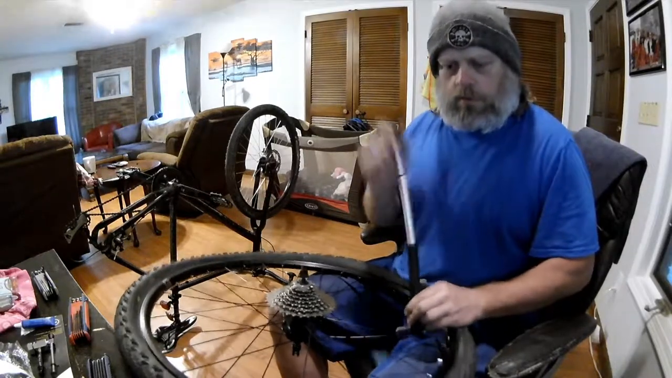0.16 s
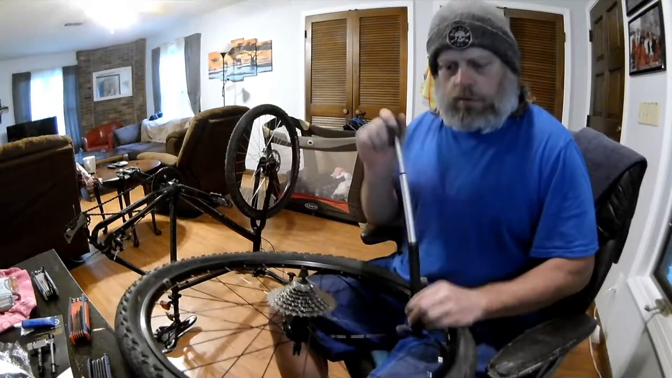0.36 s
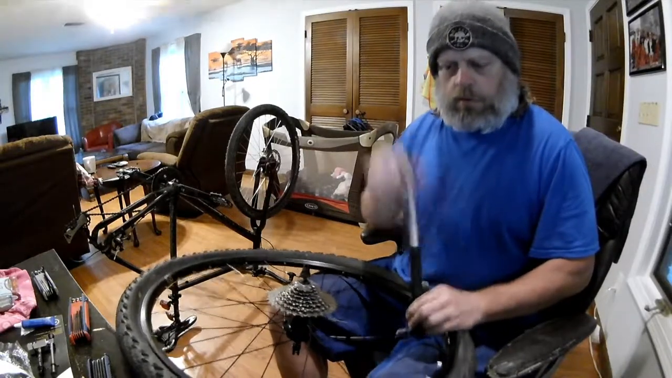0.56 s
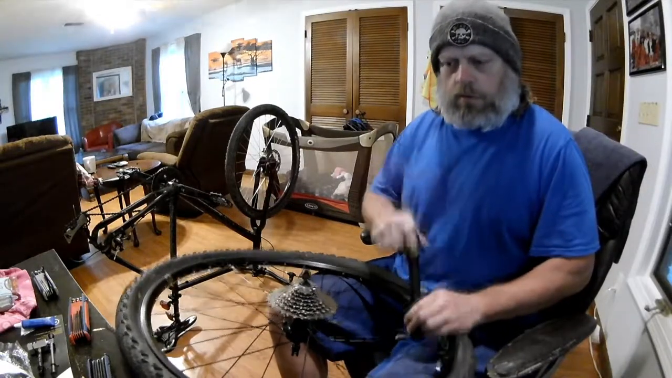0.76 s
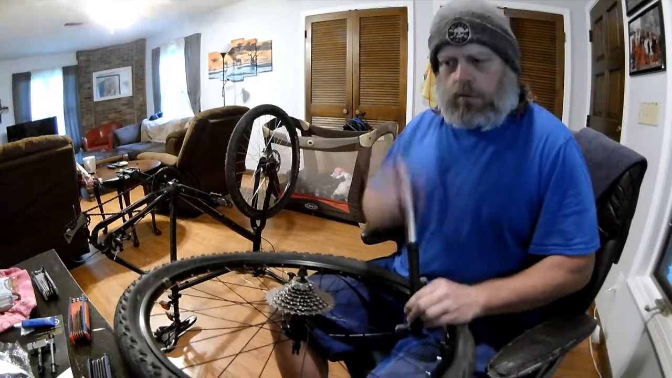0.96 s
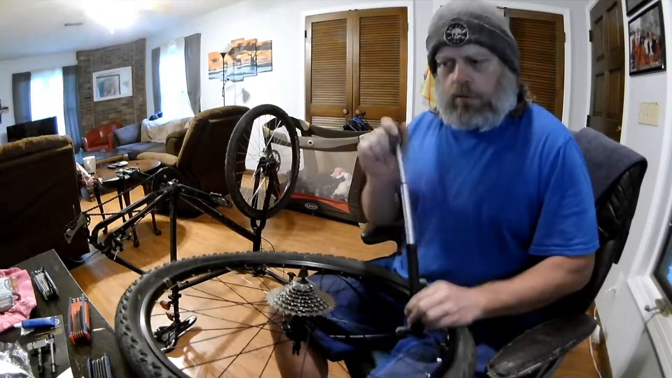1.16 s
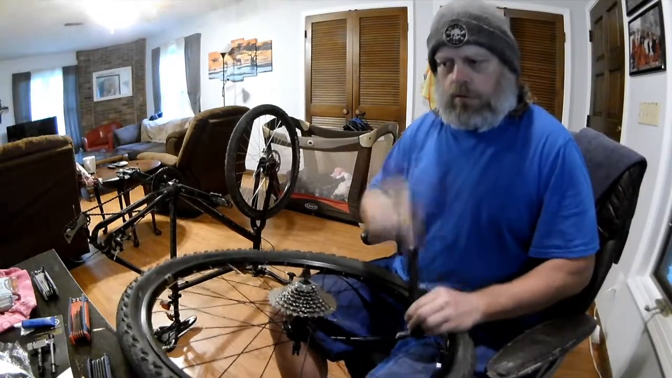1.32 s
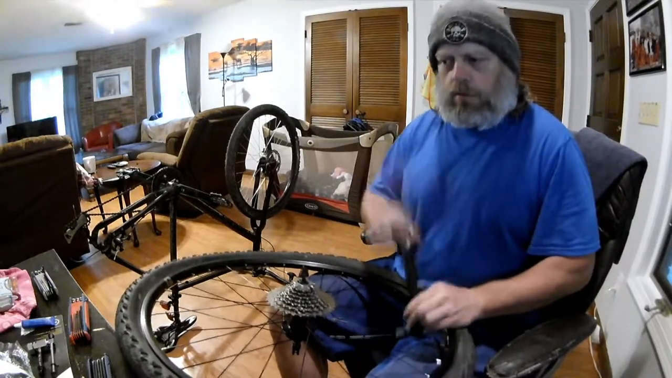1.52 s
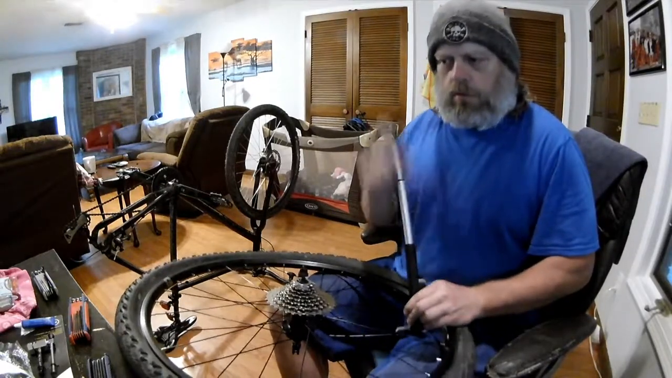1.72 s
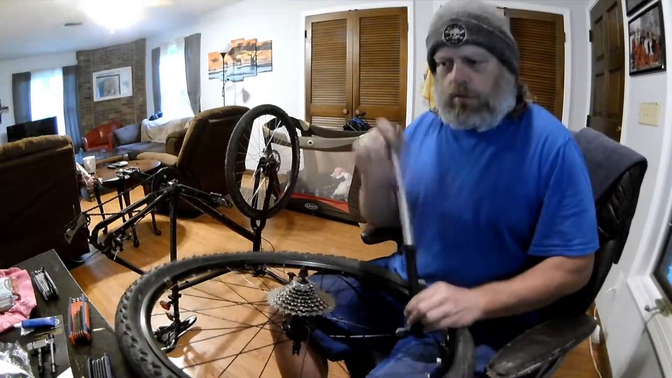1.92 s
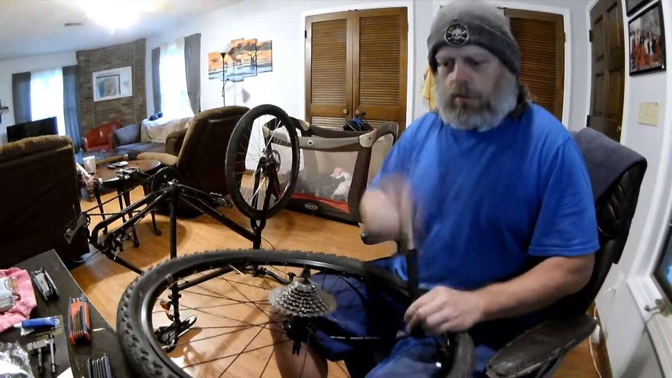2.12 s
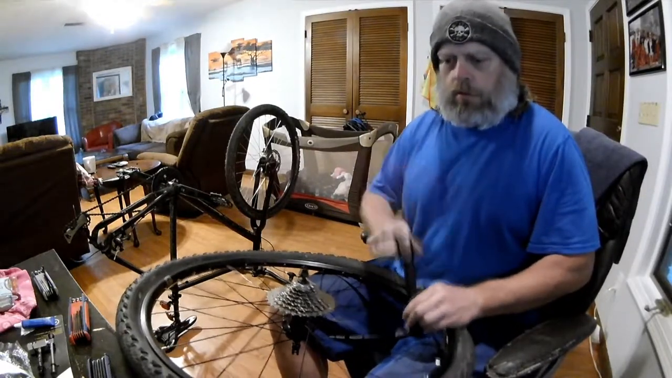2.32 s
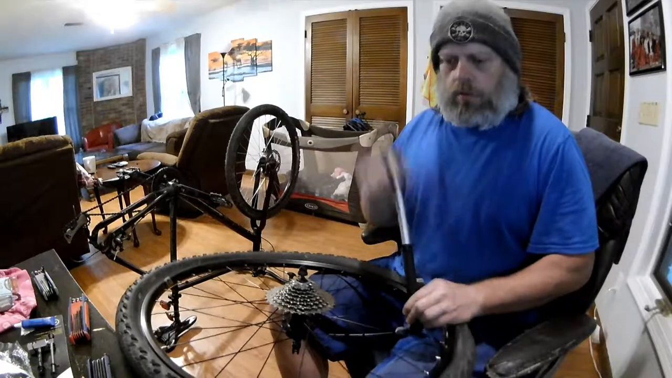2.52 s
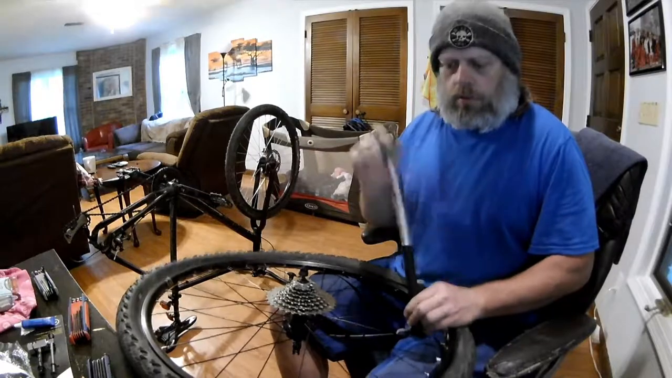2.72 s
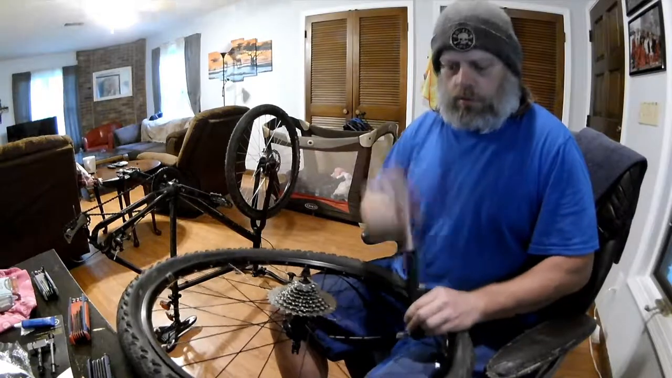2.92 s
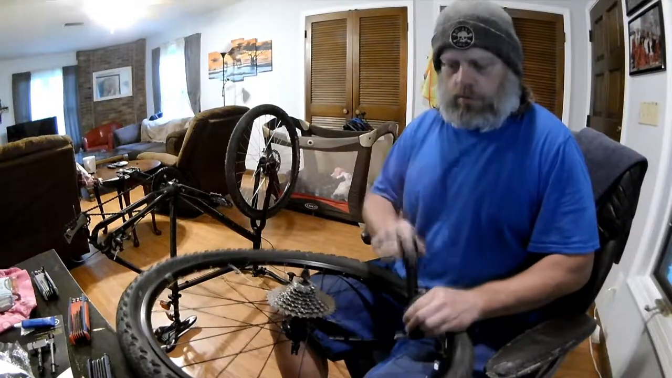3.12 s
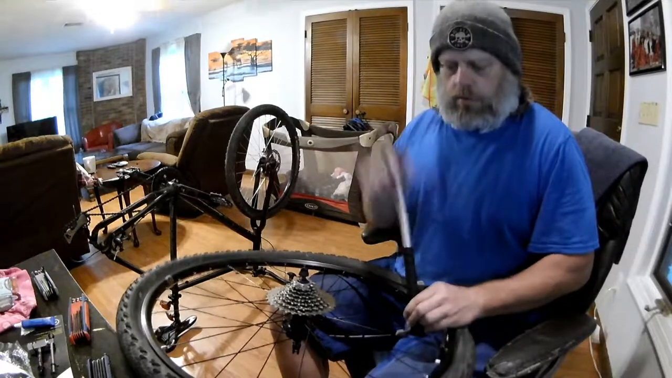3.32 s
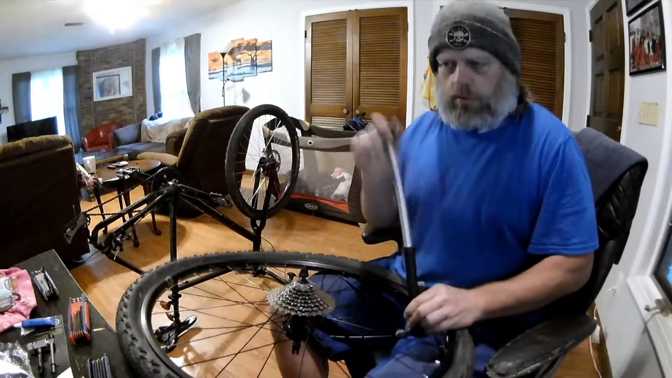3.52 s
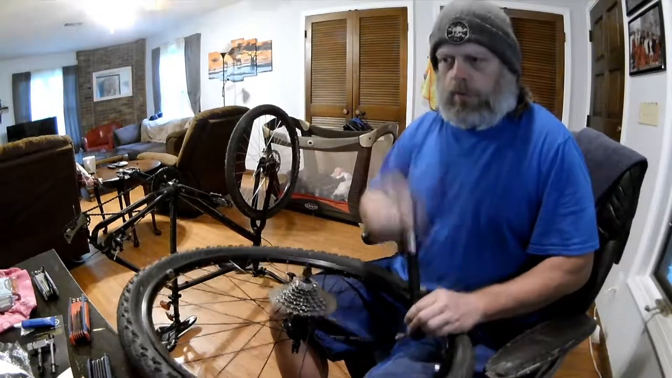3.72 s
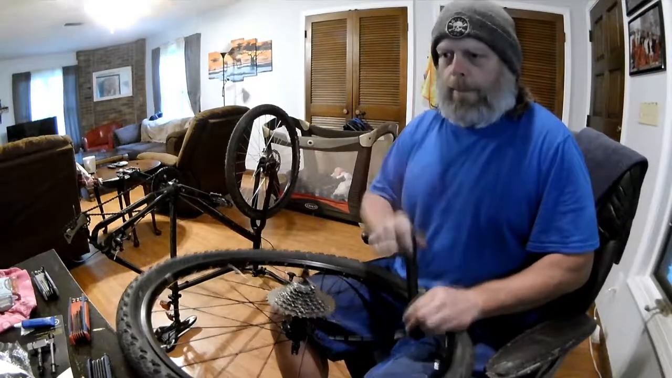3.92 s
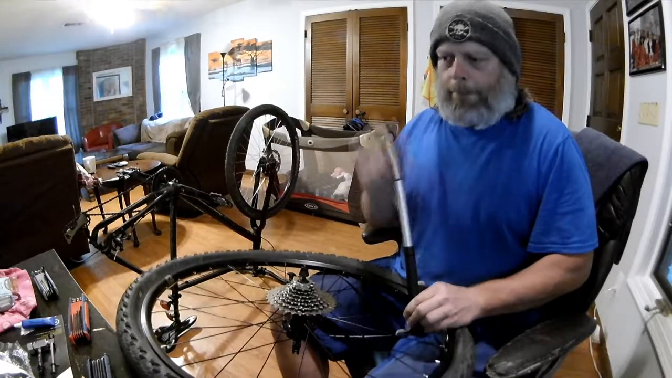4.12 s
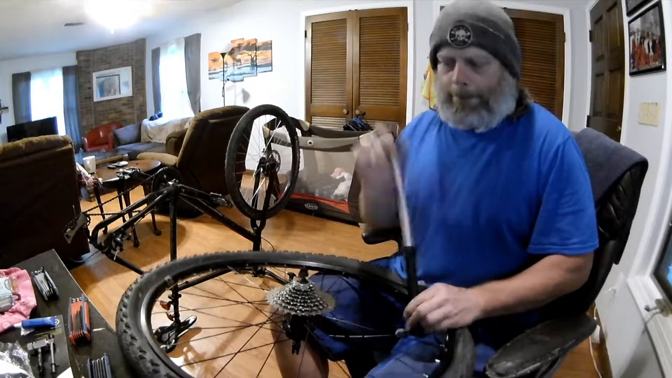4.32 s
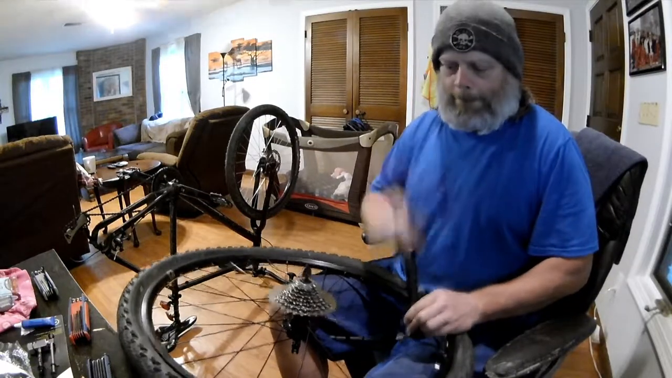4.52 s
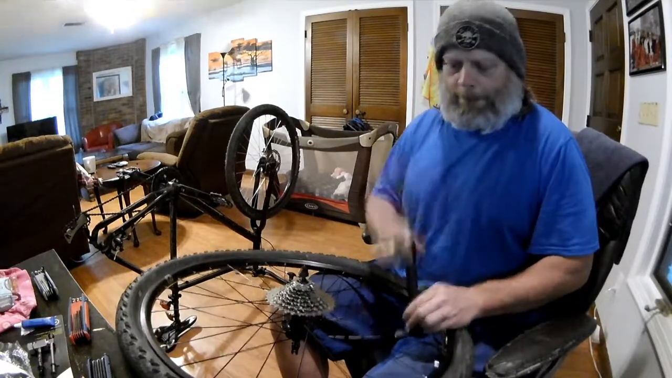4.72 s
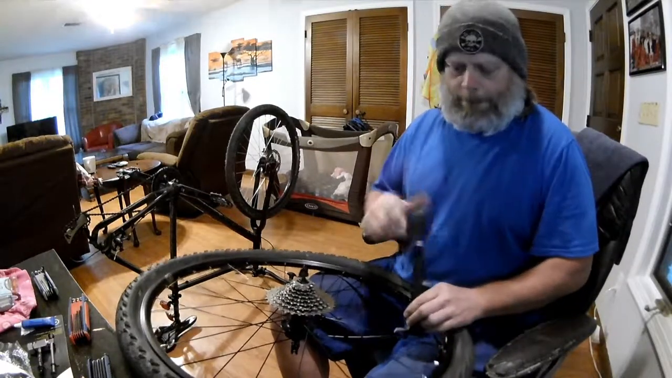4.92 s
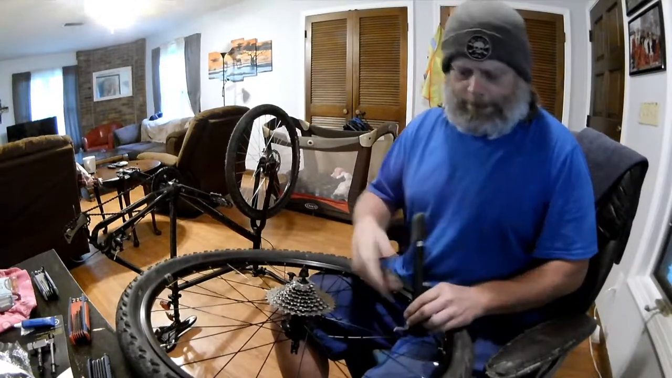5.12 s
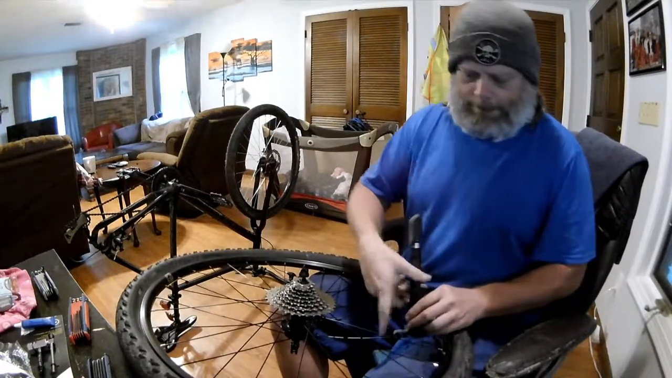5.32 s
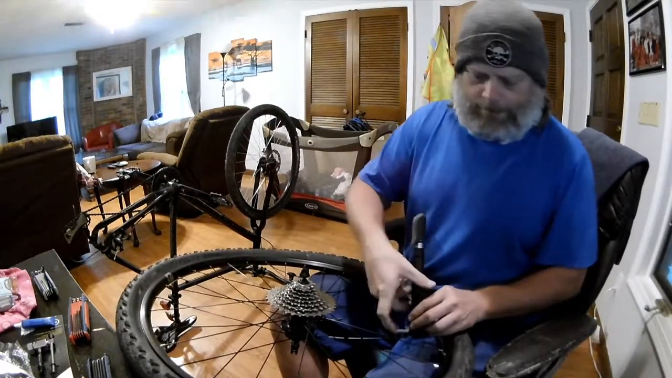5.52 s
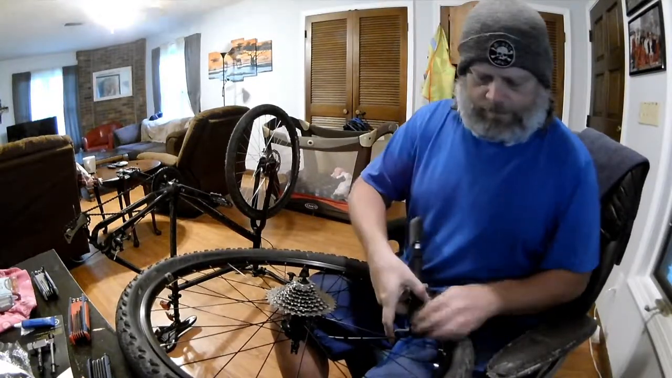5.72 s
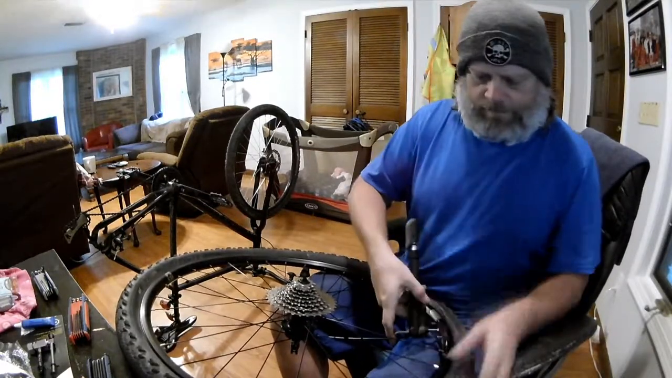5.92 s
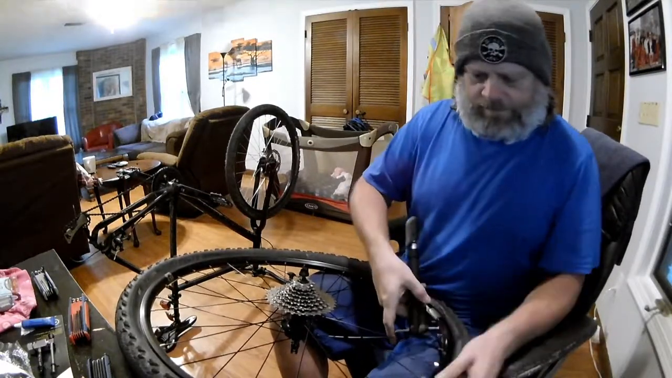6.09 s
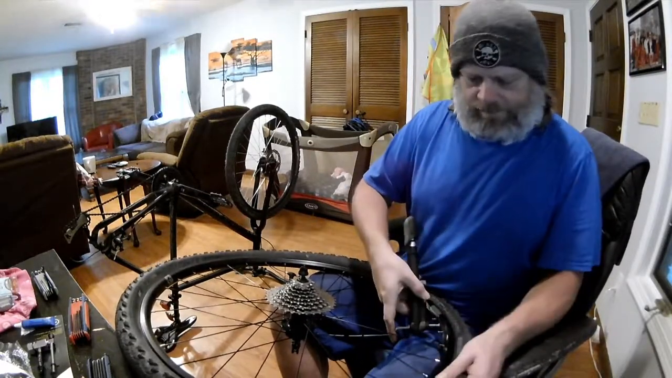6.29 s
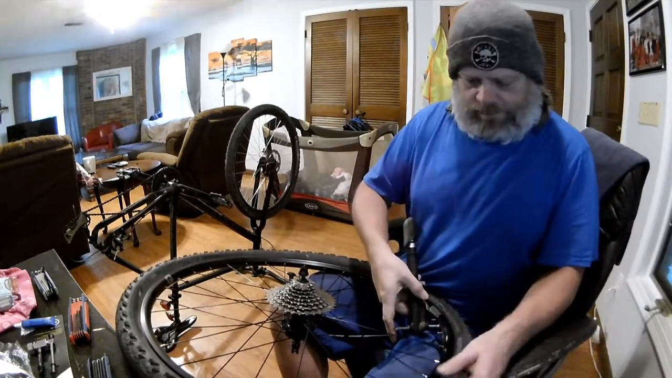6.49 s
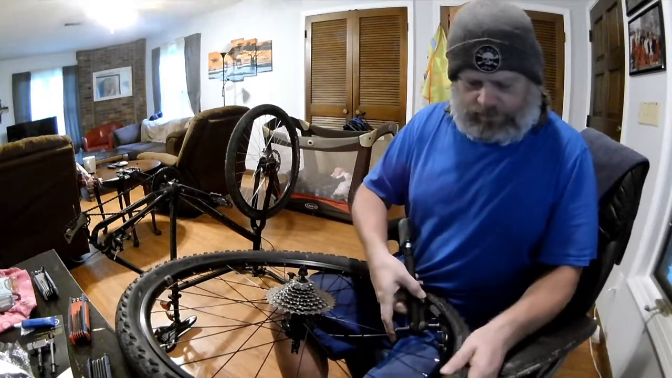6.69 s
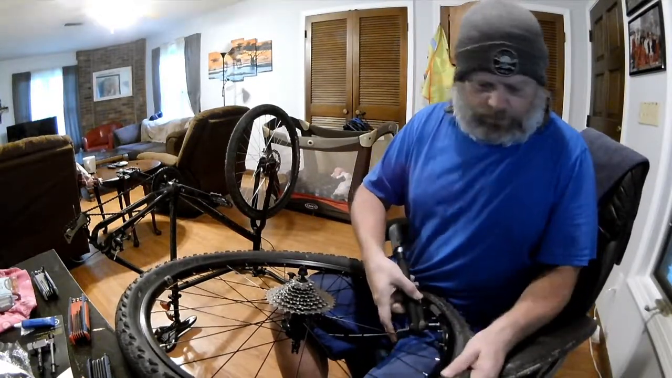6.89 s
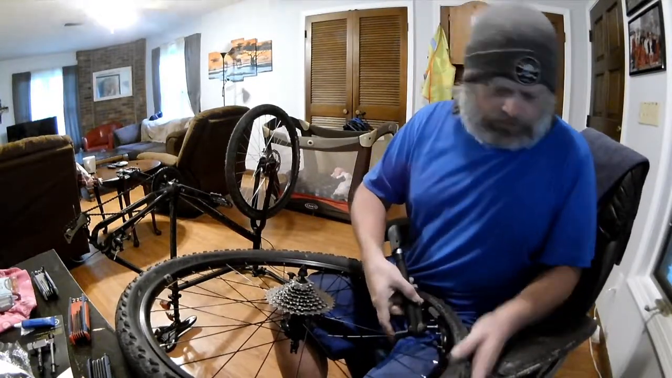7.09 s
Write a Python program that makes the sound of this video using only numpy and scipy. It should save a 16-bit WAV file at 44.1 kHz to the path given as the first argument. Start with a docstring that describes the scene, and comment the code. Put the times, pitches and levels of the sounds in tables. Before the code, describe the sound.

A small hand pump inflates a bicycle tyre in a quiet living room, close to the microphone. Nearly four strokes a second, each a hollow, ringing mid-pitched pop with a thin hiss, a soft wheel thump and light ticks. Some strokes end in a hard knock. After almost five seconds it stops on a loud clack; two short finger scuffs follow over dull room noise.

```python
"""Hand pump on a bicycle tyre

A small pump inflates a tyre in a quiet living room, nearly four strokes a second. On each push the valve pops
and rings, with a thin hiss around it; the seal rubs along the barrel and the turn of the hand thumps the wheel.
Stroke length shapes the pops, hiss, taps and thumps. Some strokes end in a knock, listed one by one.
Then the pumping stops and fingers scuff on the pump head. Rings are decaying sines, air and grit are filtered noise."""
import sys
import numpy as np
from scipy import signal
from scipy.fft import rfft, irfft
from scipy.io import wavfile

SR = 44100
rng = np.random.default_rng(int(sys.argv[2]) if len(sys.argv) > 2 else 0)


def store_pcm(level_fs):
    """Save levels as 16-bit WAV."""
    pcm = np.round(np.clip(level_fs, -1, 1) * 32767).astype(np.int16)
    wavfile.write(sys.argv[1], SR, np.atleast_2d(pcm).T)


N = 315315
T = np.arange(SR * 3 // 5) / SR   # time axis of every single short sound, in seconds

# The pushes of the pump. Each row: time of the valve pop in seconds,
# stroke length from 0 (short, with the pump nearly closed) to 1 (long).
PUSHES = [(-0.085, 0.087), (0.1802, 0.24), (0.443, 0.17), (0.7084, 0.13), (0.9765, .15), (1.261, 0.76),
          (1.526, 0.79), (1.7643, 0.17), (2.0512, 0.77), (2.319, 0.93), (2.5888, 0.92), (2.8521, 0.99),
          (3.114, 0.99), (3.379, 0.62), (3.6317, 0.18), (3.8917, 0.26), (4.1639, 0.15), (4.4418, 0.31),
          (4.7209, .96)]
# Colour of sharp contact clicks. Each row: frequency in Hz, relative level in dB.
CLICK_COLOUR = [(1500, -9), (2600, 9.5), (3600, -2.5), (5000, 1), (6800, -3.5), (9500, -6.5), (12500, -14),
                (14000, -24), (16000, -24.5)]
# Colour of a short dull contact. Each row: frequency in Hz, relative level in dB.
DULL_COLOUR = [(80, -21), (250, 9), (800, -3), (1600, 3.5), (2200, -13), (3200, -65)]
# Colour of air drawn past the piston. Each row: frequency in Hz, relative density in dB per Hz.
DRAUGHT_COLOUR = [(3000, -20), (7000, 5), (9500, -1), (12000, 6), (15000, -8)]


def from_db(db):
    """Turn decibels into an amplitude factor."""
    return 10 ** (np.asarray(db) / 20)


def peak_one(x):
    """Scale to a peak of 1."""
    return x / np.abs(x).max()


def butter(x, order, hz, kind):
    """Causal Butterworth filter."""
    sos = signal.butter(order, hz, kind, fs=SR, output="sos")
    return signal.sosfilt(sos, x + 1e-18)   # the tiny offset keeps silence from slowing the filter


def at_hz(points, hz, axis=1):
    """Read a column of a table on a log-frequency axis."""
    points = np.array(points, float)
    return np.interp(np.log(hz + 1e-9), np.log(points[:, 0]), points[:, axis])


def noise(colour, size):
    """Noise with the given colour, rms 1."""
    hz = np.arange(size // 2 + 1) * SR / size
    spectrum = rfft(rng.standard_normal(size)) * from_db(at_hz(colour, hz))
    x = irfft(spectrum, size)
    return x / x.std()


def fade(t60):
    """Exponential decay by 60 dB in t60 seconds."""
    return from_db(-60 * T / t60)


def ring(modes, scatter_db=1):
    """Struck modes (Hz, dB, t60 in s), each a little stronger or weaker on every blow."""
    out = np.zeros(len(T))
    for k, (hz, db, t60) in enumerate(modes):
        polarity = (-1) ** k
        level = from_db(db + scatter_db * rng.normal())
        out += polarity * level * np.sin(2 * np.pi * hz * T) * fade(t60)
    return out


def add(out, s, sound):
    """Mix a sound in from time s, which may lie before the start."""
    at = round(s * SR)
    first, last = max(at, 0), min(at + len(sound), N)
    out[first:last] += sound[first - at:last - at]


def by_stroke(stroke, short, long):
    """Blend between the value (or sound) for a short stroke and that for a long one."""
    share = np.clip(stroke, 0, 1)
    return (1 - share) * short + share * long


def room_response(build_s):
    """Diffuse reverberation: bands of noise, about an octave wide, that build up and die at their own rates."""
    # Reverberation of the room. Each row: frequency in Hz, level in dB, decay time t60 in seconds.
    reverb_bands = [(125, -2, 0.92), (500, -7.5, 0.31), (1140, -1.5, 0.45), (2120, -12.5, 0.33),
                    (4000, -6.5, 0.28), (12000, -6, 0.22)]
    edges = np.geomspace(70, 17000, 9)
    out = np.zeros(len(T))
    for low, high in zip(edges, edges[1:]):
        hz = np.sqrt(low * high)
        build_up = 1 - np.exp(-(T / build_s) ** 2)
        envelope = fade(at_hz(reverb_bands, hz, axis=2)) * build_up
        band = butter(rng.standard_normal(len(T)), order=2, hz=[low, high], kind="band")
        out += from_db(at_hz(reverb_bands, hz)) * band * envelope / np.linalg.norm(envelope)
    return out


def in_room(x, wet_db, build_s):
    """A short sound with its reverberation, a little different each time as the player moves."""
    wet = signal.fftconvolve(x, room_response(build_s))[:len(T)]
    return x + from_db(wet_db) * wet


def echoed(x, echoes, scatter_db=1.5):
    """The direct sound and its reflections, which change a little from push to push as the hands move."""
    out = x.copy()
    for delay_ms, db in echoes:
        delayed = np.interp(T - delay_ms / 1000, T, x, left=0)
        out += from_db(db + scatter_db * rng.normal()) * delayed
    return out


def air_pulse(ring_hz, width_hz, body_db, low_hz, top_hz):
    """The pressure step at the opening valve: a rounded pulse that rings in the pump head."""
    click = signal.unit_impulse(len(T))
    head = butter(click, order=1, hz=[ring_hz - width_hz / 2, ring_hz + width_hz / 2], kind="band")
    body = butter(click, order=1, hz=low_hz, kind="high")
    rounded = butter(head + from_db(body_db) * body, order=6, hz=top_hz, kind="low")
    return -peak_one(rounded)


def singing(start_hz, end_hz, glide_s, width_hz):
    """Air sings on in the pump head, rising in pitch as the chamber shrinks; rms 1."""
    hz = end_hz + (start_hz - end_hz) * np.exp(-T / glide_s)
    # complex low-pass noise makes the tone waver in level and phase
    raw = rng.standard_normal(len(T)) + 1j * rng.standard_normal(len(T))
    flutter = butter(raw, order=2, hz=width_hz / 2, kind="low")
    tone = np.real(flutter * np.exp(2j * np.pi * np.cumsum(hz) / SR))
    return tone / tone.std()


def valve():
    """Each push pops the valve: air rings in the head and the barrel, and the pin ticks against its seat."""
    # Strongest reflections from wheel, body and floor, on a short and on a long stroke.
    # Each row: delay in ms, level in dB.
    short_echoes = [(2.8, -15), (3.52, -14), (5.56, -1), (7.49, -7.5), (8.54, -5), (9.94, -11), (12.17, -4),
                    (18.29, -18), (26.96, -8.5)]
    long_echoes = [(1.25, -5), (2.68, -0.5), (4.03, 1.5), (6.46, -6.5), (8.88, -0.5), (10.95, 0.5),
                   (11.96, -9), (28.36, -8)]
    ring_scatter = 0.0034     # share by which the pitch of the head differs from push to push
    last_push_pitch = 0.99    # the head rings a little lower on the last push, which is not pulled back
    out = np.zeros(N)
    for k, (s, stroke) in enumerate(PUSHES, start=1):
        pop_db = by_stroke(stroke, short=-7.5, long=-17.5)   # a short jab pops harder
        pitch = last_push_pitch if k == len(PUSHES) else 1
        detune = pitch + ring_scatter * rng.normal()

        # the sharp front edge of the pop
        snap = ring([(2260, -27.5, 0.009), (2700, -17, 0.0052)])
        short_pulse = air_pulse(ring_hz=1950 * detune, width_hz=235, body_db=-16.5, low_hz=516, top_hz=1970)
        long_pulse = air_pulse(ring_hz=2015 * detune, width_hz=171, body_db=-23.5, low_hz=500, top_hz=1930)
        # the air column in the barrel rings lower
        short_barrel = ring([(968, -11, 0.017), (1125, -11, 0.03)])
        long_barrel = ring([(655, -26.5, 0.07), (1142, -14, 0.062)])
        short_pop = echoed(short_pulse, short_echoes) + short_barrel
        long_pop = from_db(1) * echoed(long_pulse, long_echoes) + long_barrel
        pop = from_db(pop_db) * (by_stroke(stroke, short_pop, long_pop) + snap)

        pin_db = by_stroke(stroke, short=-37, long=-38.5)
        pin_envelope = fade(0.026) * (1 - np.exp(-T / 0.002))
        pin_tick = from_db(pin_db) * noise(CLICK_COLOUR, len(T)) * pin_envelope

        song = singing(start_hz=2027 * detune, end_hz=2170 * detune, glide_s=0.0593, width_hz=270)
        song = from_db(pop_db - 33.5) * song * fade(0.65)
        add(out, s, in_room(pop + pin_tick, wet_db=-1.0, build_s=0.0091) + song)
    return out


def whistles(lead_s=0.037, crest_s=0.051, width_s=0.02):
    """Pressure builds before each pop and peaks just after it, forcing a thin hiss through the valve."""
    out = np.zeros(N)
    swell = np.exp(-((T - crest_s) / width_s) ** 2 / 2)
    for s, stroke in PUSHES:
        whistle = butter(rng.standard_normal(len(T)), order=2, hz=[9200, 10200], kind="band")
        draught = noise(DRAUGHT_COLOUR, len(T))
        air = from_db(8) * whistle / whistle.std() + from_db(-5.5) * draught
        whistle_db = by_stroke(stroke, short=-73, long=-86.5)   # a short jab hisses harder
        add(out, s - lead_s, from_db(whistle_db) * air * swell)
    return out


def thumps():
    """The turn of the stroke shoves the tyre: a few cycles of low, soft sound."""
    # What the shoved tyre rings with. Each row: frequency in Hz, level in dB, decay time t60 in seconds.
    tyre_modes = [(128, -8, 0.03), (214.5, -1, 0.052), (350, -1.5, 0.041)]
    growth_s = 0.67   # the thumps grow over the first strokes as the arm gets into its swing
    out = np.zeros(N)
    for s, stroke in PUSHES[:-1]:
        swing = 1 - np.exp(-((s - PUSHES[0][0]) / growth_s) ** 2)
        soft_onset = 1 - np.exp(-T / 0.0018)
        thump = swing * peak_one(ring(tyre_modes, scatter_db=2) * soft_onset)
        level_db = by_stroke(stroke, short=-32, long=-29.5)
        # the hand turns round soon after the pop, sooner on a long stroke
        delay_s = by_stroke(stroke, short=0.09, long=0.048)
        add(out, s + delay_s, in_room(from_db(level_db) * thump, wet_db=-0.5, build_s=0.0048))
    return out


def contact(click_db, rattle_t60):
    """A hard contact: a click, the ring of the pump and a short rattle of loose parts."""
    # What the knocked pump rings with. Each row: frequency in Hz, level in dB, decay time t60 in seconds.
    pump_modes = [(463, -7.5, 0.036), (793, -1.5, 0.037), (1100, -2, 0.031), (1400, 1, 0.013),
                  (1864, -4.5, 0.031), (2170, -7.5, 0.036)]
    click_envelope = fade(0.034) + 0.64 * fade(rattle_t60)
    click = from_db(click_db) * noise(CLICK_COLOUR, len(T)) * click_envelope
    rattle = from_db(-12) * noise(DULL_COLOUR, len(T)) * fade(rattle_t60)
    body = 1.78 * peak_one(ring(pump_modes)) + rattle
    return in_room(body + click, wet_db=0.5, build_s=0.0062)


def knocks():
    """The piston hits its stop at the end of its travel and the wheel thuds under it."""
    # Each row: start in seconds, level in dB, thud level relative to the knock in dB, rattle t60 in seconds.
    knock_rows = [(0.3605, -20.5, 2, 0.13), (2.352, -24, -10, 0.03), (2.6227, -27, -8, .038),
                  (2.886, -26, 0, 0.046), (3.1578, -30, -14, 0.036), (3.5631, -28, -3, 0.047),
                  (4.4991, -28, -20, 0.039), (4.744, -19.5, -10, 0.034)]
    # What the wheel thuds with. Each row: frequency in Hz, level in dB, decay time t60 in seconds.
    wheel_modes = [(119.6, -13.5, 0.36), (200, -12.5, 0.15)]
    click_growth = 0.32   # a harder knock clicks more brightly: dB of click per dB of knock
    out = np.zeros(N)
    hardest_db = np.array(knock_rows)[:, 1].max()
    for s, db, thud_db, rattle_t60 in knock_rows:
        hit = contact(click_db=-22.0 + click_growth * (db - hardest_db), rattle_t60=rattle_t60)
        thud = from_db(thud_db) * ring(wheel_modes)
        add(out, s, from_db(db) * (hit + thud))
    return out


def sliding():
    """The seal rubs along the barrel, most where the piston is fastest; the working pump rumbles."""
    turn_s, rest_s = 0.07, 0.2   # the piston turns this long after each pop; it comes to rest this long after the last
    t = np.arange(N) / SR
    pops = np.array(PUSHES)[:, 0]
    cycle = np.interp(t - turn_s, pops, np.arange(len(pops)))
    speed = np.abs(np.sin(2 * np.pi * cycle))   # highest in the middle of push and pull
    working = np.clip(1 - (t - pops[-1]) / rest_s, 0, 1)
    rub_colour = [(1500, -10), (3000, 1.5), (5200, -1), (7000, -4.5), (10000, -10.5), (15000, -19)]
    rumble_colour = [(40, -32.5), (90, -39.5), (125, 2.5), (170, -15.0), (230, -9.0), (600, -14.0),
                     (1500, -15.5), (3000, -59)]
    rub = from_db(-70.5) * noise(rub_colour, N) * (0.57 + 0.54 * speed)
    rumble = from_db(-51.5) * noise(rumble_colour, N)
    return working * (rub + rumble)


def taps():
    """On a long stroke the rubber seal seats just before the pop: a dull tap that hardly rings."""
    lead_s, rise_db_per_s = 0.041, 4.5   # the taps get harder as the tyre fills
    out = np.zeros(N)
    for s, stroke in PUSHES:
        db = by_stroke(stroke, short=-81, long=-42.5) + rise_db_per_s * s
        dull_burst = noise(DULL_COLOUR, len(T)) * fade(0.014)
        tap = peak_one(butter(dull_burst, order=4, hz=1800, kind="low"))
        add(out, s - lead_s, in_room(from_db(db) * tap, wet_db=1.5, build_s=0.0067))
    return out


def ticks():
    """Between one push and the next the piston ticks faintly in the barrel as it starts back."""
    jitter_s, level_db, scatter_db = 0.012, -45, 2.5
    out = np.zeros(N)
    for s, stroke in PUSHES[:-1]:
        delay_s = by_stroke(stroke, short=0.135, long=0.1) + jitter_s * rng.normal()
        level = from_db(level_db + scatter_db * rng.normal())
        add(out, s + delay_s, level * contact(click_db=-22, rattle_t60=0.032))
    return out


def intake():
    """Each pull sucks a soft puff of fresh air past the piston."""
    level_db, width_s = -73, 0.016
    t = np.arange(N) / SR
    flow = np.zeros(N)
    for s, stroke in PUSHES[:-1]:
        crest_s = s + by_stroke(stroke, short=0.165, long=0.135)
        flow += np.exp(-((t - crest_s) / width_s) ** 2 / 2)
    return from_db(level_db) * noise(DRAUGHT_COLOUR, N) * flow


def scuffs():
    """A finger lands on the pump head and drags: a small knock, then grit with a faint rasp above it."""
    # Each row: start in seconds, level in dB, rasp level relative to the scuff in dB.
    scuff_rows = [(5.151, -39, -22.5), (6.0504, -27, -32.5)]
    out = np.zeros(N)
    for s, db, rasp_db in scuff_rows:
        touch = ring([(1520, -11, 0.069), (820, -13, 0.03)])
        grit = rng.standard_normal(len(T)) * fade(0.21)
        bright_grit = butter(grit, order=2, hz=[1450, 1950], kind="band")
        dark_grit = butter(grit, order=4, hz=1310, kind="low")
        drag = peak_one(bright_grit + from_db(-1.0) * dark_grit)
        rasp = from_db(rasp_db) * noise(CLICK_COLOUR, len(T)) * fade(0.14)
        scuff = from_db(db) * (touch + from_db(-6) * drag + rasp)
        add(out, s, in_room(scuff, wet_db=0, build_s=0.01))
    return out


def background():
    """Steady dull room noise, a little mains hum and microphone hiss."""
    # Colour of the room noise. Each row: frequency in Hz, relative density in dB per Hz.
    room_colour = [(20, -2.5), (70, 4), (95, -1.5), (125, 3.5), (165, -2.5), (230, 1.5), (310, -4),
                   (480, -0.5), (1200, -3), (1600, -12), (2000, -13), (2500, -23), (3100, -40.5),
                   (4500, -46.5)]
    # Colour of the microphone hiss. Each row: frequency in Hz, relative density in dB per Hz.
    hiss_colour = [(1000, 0.5), (3500, 1), (5000, -1.5), (7000, -3.5), (10000, -7), (13000, -12),
                   (15500, -19.5)]
    room_db, hum_db, hiss_db = -45, -61.5, -69.5   # rms levels
    hum_hz = 117.7
    hum = np.sqrt(2) * np.sin(2 * np.pi * hum_hz * np.arange(N) / SR)   # rms 1
    room = from_db(room_db) * noise(room_colour, N)
    hiss = from_db(hiss_db) * noise(hiss_colour, N)
    return room + from_db(hum_db) * hum + hiss


def scene():
    """Pump and room, heard in mono."""
    pump_air = valve() + whistles() + intake()
    pump_contacts = knocks() + ticks() + taps() + thumps() + scuffs()
    return (pump_air + pump_contacts + sliding() + background())[None]


def record(dry, notch_hz=7950, notch_q=4.0, notch_depth=0.83, cutoff_hz=15830):
    """The microphone has a hollow in the treble; the top is cut steeply."""
    notched = signal.lfilter(*signal.iirnotch(notch_hz, notch_q, SR), dry)
    coloured = dry + notch_depth * (notched - dry)
    top_cut = signal.ellip(10, 0.1, 70, cutoff_hz, fs=SR, output="sos")   # 0.1 dB ripple, 70 dB rejection
    return signal.sosfilt(top_cut, coloured)


dry = scene()
out = record(dry)
store_pcm(out)
```